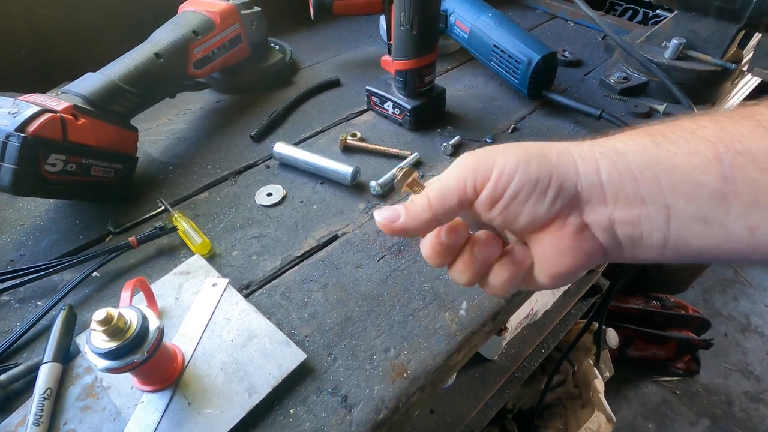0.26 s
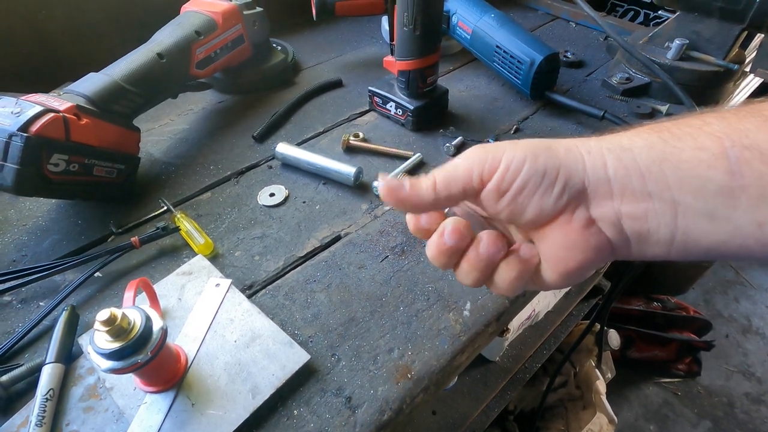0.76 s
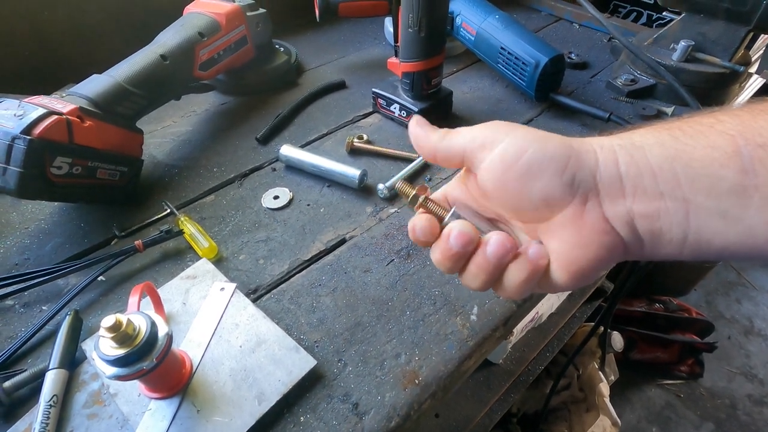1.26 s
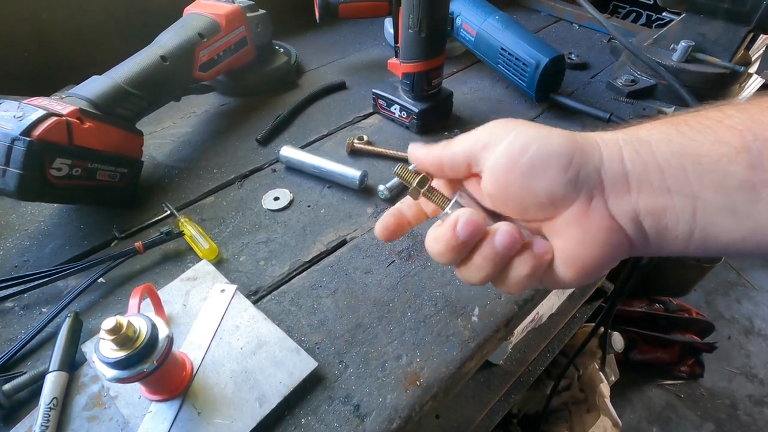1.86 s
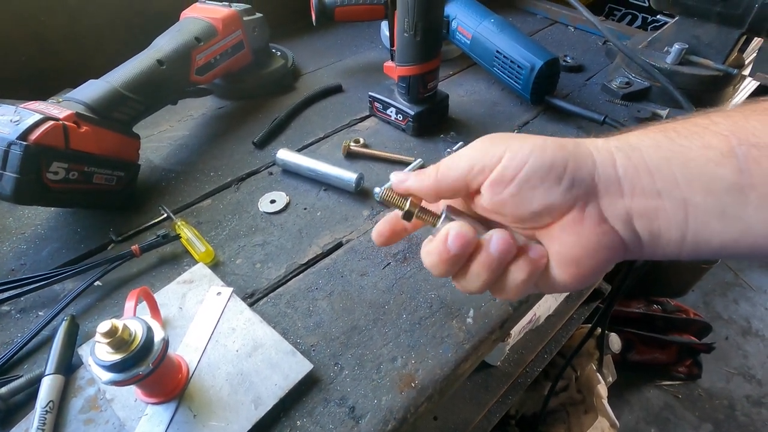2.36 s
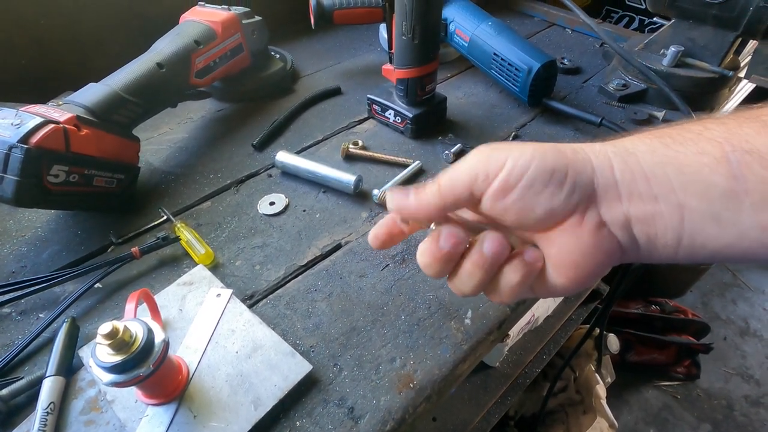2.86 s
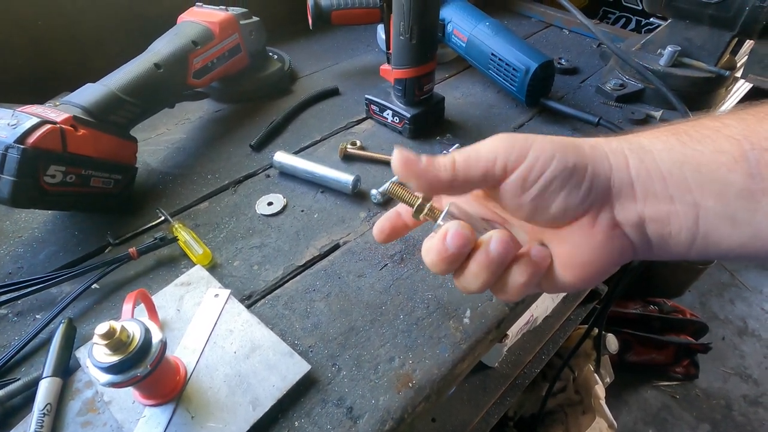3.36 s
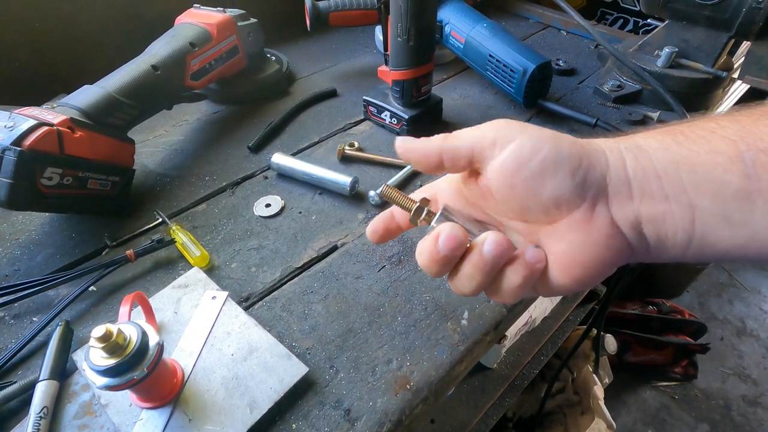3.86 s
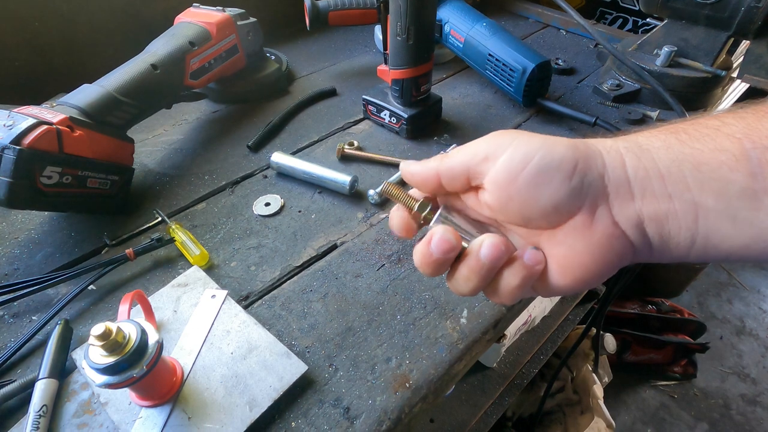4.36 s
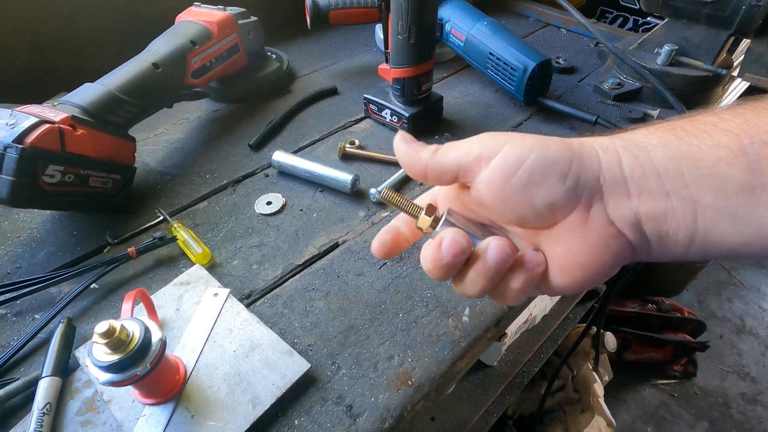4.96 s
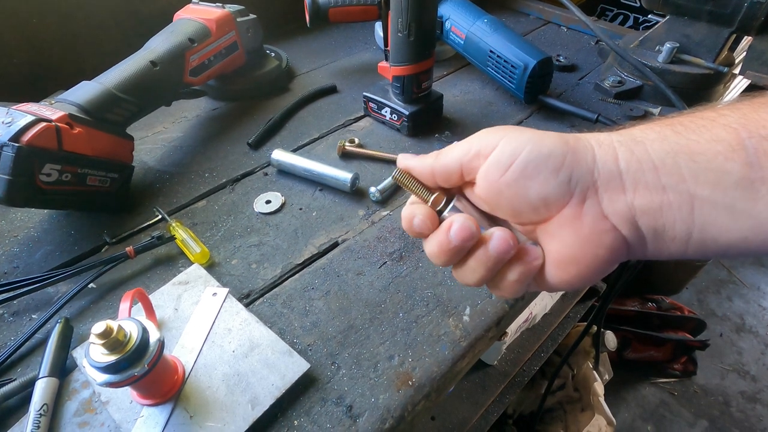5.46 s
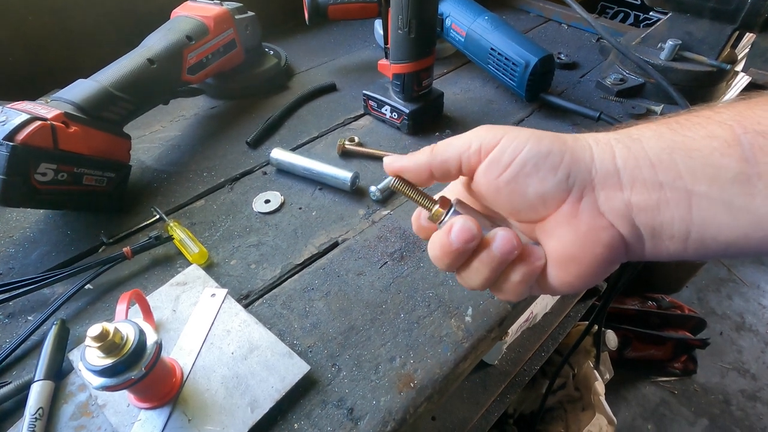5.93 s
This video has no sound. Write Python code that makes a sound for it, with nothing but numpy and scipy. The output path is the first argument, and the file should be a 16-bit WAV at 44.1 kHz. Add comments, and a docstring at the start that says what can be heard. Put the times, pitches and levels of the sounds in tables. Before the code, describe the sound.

Close metallic clicking and scraping, about twice a second, as a nut is spun on a bolt in a workshop, with soft traffic rumble far off.

```python
"""A thumb flicks a steel nut along a hand-held bolt, about twice a second, close to a microphone pair.
Each flick grabs, pushes and slips: the threads scrape, the nut clacks and rings, and the bolt knocks in the fist.
The steel is struck or rubbed by bursts of tiny impacts that ring its resonances, with a short workshop tail.
Far off, shaped noise rumbles as traffic, and a small bird's gliding tones chirp faintly outside."""
import sys
import numpy as np
from scipy import signal
from scipy.fft import rfft, irfft, next_fast_len
from scipy.io import wavfile
from scipy.ndimage import map_coordinates

SR = 44100
rng = np.random.default_rng(int(sys.argv[2]) if len(sys.argv) > 2 else 0)


def digitize_waveform(pressure):
    """Quantize a signal to 16-bit integers and store it at the path in sys.argv[1].

    Rows of a 2-D input are taken as channels; values are limited to [-1, 1].
    """
    field = np.atleast_2d(pressure).T
    bounded = np.clip(field, -1, 1)
    quanta = np.round(bounded * 32767).astype(np.int16)
    wavfile.write(sys.argv[1], SR, quanta)


N = 273137
SIZE = 16384  # samples in one contact sound
HZ = np.fft.rfftfreq(SIZE, 1 / SR)
TIME = np.arange(N) / SR
SHORT_TIME = np.arange(SIZE) / SR

# colour of the bolt damped by the fist: (frequency [Hz], relative level [dB])
BOLT_COLOUR = [(400, -40), (1100, -20), (2100, -32.5), (2550, -4.5), (3500, -5.5), (4350, 2), (5000, -3.5),
               (7000, -10.5), (8200, -16.5), (13000, -20.5), (14800, -47.5)]
# modes that stand out of that colour: (frequency [Hz], width [Hz], relative level [dB])
BOLT_MODES = [(4345, 70, 4), (5291, 70, -6), (6446, 90, -2), (6865, 60, -3)]
# the nut's ring: (frequency [Hz], width [Hz], relative level [dB])
NUT_MODES = [(11830, 46, 0), (12172, 48, -3), (11950, 650, -20)]
# the dull knock in the fist: (frequency [Hz], width [Hz], relative level [dB])
KNOCK_MODES = [(2100, 280, -7.5), (2508, 150, 8)]
# each flick: the thumb grabs the nut, pushes it with a clack, then it slips free with a second clack:
# (time [s], grab strength [dB], push strength [dB], clack strength [dB],
#  wait until the slip [s], slip strength [dB], second clack strength [dB], how freely the nut rings [dB])
THUMB_FLICKS = [(0.323, -33.5, -31.5, -35, .0267, -45, -21.5, -3.5),
                (0.746, -39.5, -31, -30, 0.044, -45, -39, -4.5),
                (1.1495, -41.5, -39.5, -28.5, .053, -43, -36, -6.5),
                (1.6401, -41.5, -41.5, -13, 0.048, -25, -28.5, -0.5),
                (2.0927, -29.5, -33, -25.5, 0.019, -41, -38, 5.5),
                (2.5068, -39, -23.5, -20, .046, -38.5, -26, -0.5),
                (2.954, -34, -25.5, -32, .0442, -48, -24.5, 2),
                (3.3644, -40, -42, -25.5, .0424, -32.5, -26, 0),
                (3.7551, -42, -43, -16.5, .0457, -27, -27.5, 0),
                (4.158, -43.5, -43.5, -31, .038, -63, -52.5, -9),
                (4.6076, -62, -37, -21.5, .012, -51, -48, -14),
                (4.943, -55, -41.5, -20.5, .0225, -63, -38.5, -1),
                (5.2378, -42, -30, -25, 0.042, -40.5, -42, -9),
                (5.637, -37.5, -30, -29, 0.015, -45, -30, -8),
                (6.0254, -45.5, -26.5, -19.5, 0.06, -44, -46, -12.5)]
GRIP_KNOCK = 0.22  # a grip that damps the nut passes more into the fist: dB of knock per dB of ring lost


def amp(db):
    """Decibels to gain."""
    return 10 ** (np.asarray(db) / 20)


def unit(x):
    """Scale to rms 1."""
    return x / np.sqrt(np.mean(x ** 2) + 1e-20)


def along(points, hz):
    """Values of (frequency [Hz], value) points, read on a log frequency axis."""
    f, v = np.transpose(points)
    return np.interp(np.log(hz + 1), np.log(f + 1), v)


def curves(rows):
    """One value per sample for each column after the time."""
    s, *cols = np.transpose(rows)
    return [np.interp(TIME, s, c) for c in cols]


def add(track, s, sound):
    """Mix a sound into a track at s seconds."""
    part = track[max(round(s * SR), 0):][:len(sound)]
    part += sound[:len(part)]


def filtered(x, response):
    """Pass x through a complex response of frequency."""
    m = next_fast_len(N + SR // 2)
    spectrum = rfft(x, m) * response(np.fft.rfftfreq(m, 1 / SR))
    return irfft(spectrum, m)[..., :N]


def resonances(modes, hz):
    """Causal response of damped modes, each (frequency [Hz], width [Hz], level [dB])."""
    return sum(amp(db) * 1j * hz * w / (c * c - hz * hz + 1j * hz * w) for c, w, db in modes)


def causal(gain):
    """Minimum-phase response with the given gain, so that the sound starts at the blow."""
    cepstrum = irfft(np.log(gain))
    cepstrum[1:SIZE // 2] *= 2
    cepstrum[SIZE // 2 + 1:] = 0
    return np.exp(rfft(cepstrum))


def grit(size, rate, spread_db, smooth):
    """Tiny impacts of uneven size, rate a second, over smooth friction noise."""
    hits = (rng.random(size) < rate / SR) * rng.choice([-1, 1], size)
    sizes = amp(spread_db * np.clip(rng.standard_normal(size), -2, 2))
    return unit(hits * sizes) + smooth * rng.standard_normal(size)


def contact(envelope, force, levels_db, vary_db, harden=0.89, firm_db=-31, softest_db=-9):
    """One contact drives bolt, nut and knock; the bolt's colour shifts with the point that is touched."""
    knots = np.linspace(0, SR / 2, num=44)
    shift_db = vary_db * np.interp(HZ, knots, rng.standard_normal(len(knots)))
    colour_db = along(BOLT_COLOUR, HZ) + shift_db
    # a contact that rings the nut harder is shorter, hence brighter
    firmness_db = max(levels_db[1] - firm_db, softest_db)
    colour_db += harden * firmness_db * np.log2(np.maximum(HZ / 6000, 1))
    bolt = causal(amp(colour_db)) * (1 + resonances(BOLT_MODES, HZ))
    nut = resonances(NUT_MODES, HZ)
    knock = resonances(KNOCK_MODES, HZ) * resonances([(2400, 2400, 0)], HZ)
    drive = rfft(envelope * force)
    strength = np.sqrt(np.mean(envelope ** 2))
    bodies = zip(levels_db, (bolt, nut, knock))
    return strength * sum(amp(db) * unit(irfft(drive * body)) for db, body in bodies)


def clicks(rows, t60, settle_db, settle_t60=0.087, snap=0.83, vary_db=3.6):
    """Each click is a sharp blow, a few milliseconds of chatter and a faint settling rattle.

    Rows are (time [s], bolt strength [dB], nut strength [dB], knock strength [dB]); t60s are in seconds.
    """
    track = np.zeros(N)
    chatter = amp(-60 * SHORT_TIME / t60)
    settling = amp(settle_db - 60 * SHORT_TIME / settle_t60)
    for s, *levels_db in rows:
        force = grit(SIZE, rate=3600, spread_db=11.0, smooth=0.99)
        force[0] += snap
        add(track, s, contact(chatter + settling, force, levels_db, vary_db))
    return track


def clacks(ring_limit_db=-20.5, clack_knock_db=-13):
    """The nut strikes the thread as it is pushed and again as it slips free."""
    rows = []
    for s, _, _, first_db, wait, _, second_db, ring_db in THUMB_FLICKS:
        for at, db in (s, first_db), (s + wait, second_db):
            nut_db = min(db, ring_limit_db) + ring_db  # harder blows ring the nut no louder
            knock_db = db + clack_knock_db - GRIP_KNOCK * ring_db
            rows.append((at, db, nut_db, knock_db))
    return clicks(rows, t60=0.016, settle_db=-21.0)


def rubs(catch_rate=145, catch_db=6.0):
    """Each push of the thumb grinds the threads in three swells of dense tiny impacts: grab, push and slip."""
    # the scrapes of grab, push and slip:
    # (time to rise 30 dB [s], time to fall 30 dB [s], nut ring [dB], dull knock [dB])
    scrapes = [(.017, 0.0984, -9, -10), (.018, 0.0371, 1, -22.5), (.026, 0.022, -3.5, -16.5)]
    grab_lead_s, scrape_lag_s = 0.023, .003  # the grab peaks before the clack, the others just after theirs
    track = np.zeros(N)
    for s, grab_db, push_db, _, wait, slip_db, _, ring_db in THUMB_FLICKS:
        grab = s - grab_lead_s, grab_db
        push = s + scrape_lag_s, push_db
        slip = s + wait + scrape_lag_s, slip_db
        for (peak, db), (rise, fall, nut_db, knock_db) in zip((grab, push, slip), scrapes):
            lead = 2 * rise
            since_peak = SHORT_TIME - lead
            envelope = amp(-30 * np.maximum(-since_peak / rise, since_peak / fall))
            # the flanks catch at uneven intervals; each catch starts hard and eases off
            catches = np.cumsum(rng.uniform(.3, 1.6, size=200)) / catch_rate
            easing = np.interp(SHORT_TIME, catches, np.arange(len(catches))) % 1
            grinding = grit(SIZE, rate=2000, spread_db=5.0, smooth=0.34)
            force = unit(amp(-2 * catch_db * easing)) * grinding
            levels_db = db, db + ring_db + nut_db, db + knock_db - GRIP_KNOCK * ring_db
            add(track, peak - lead, contact(envelope, force, levels_db, vary_db=5.5))
    return track


def taps(bolt_db=-6.0, nut_db=-30, damping=0.31):
    """The thumb lands on the bolt with a dull knock, and the flesh damps its ring."""
    # the thumb lands on the loosely held bolt: (time [s], strength before damping [dB])
    thumb_landings = [(0.214, -30.5), (0.305, -22), (0.334, -30), (0.3499, -25), (0.6395, -30), (0.733, -26),
                      (0.774, -28.5), (1.0487, -32), (1.136, -26), (1.334, -27)]
    rows = [(s, db + bolt_db, db + nut_db, db) for s, db in thumb_landings]
    knocks = clicks(rows, t60=0.01, settle_db=-19)
    damped_mode = [(KNOCK_MODES[1][0], 260, 0)]
    return filtered(knocks, lambda hz: 1 - damping * resonances(damped_mode, hz))


def ticks(damped_db=-20, free_db=-4, knock_db=-12, soft_db=-5, bend=(4480, 700, -4)):
    """Under the thumb the nut clicks softly, mostly bending the bolt; just after a flick it is free to ring."""
    # the nut rocks in its play: (time [s], strength before softening [dB])
    rocking = [(0.332, -25.5), (0.3757, -33), (1.175, -34), (1.94, -52), (2.36, -50), (2.4864, -37.5),
               (2.8463, -40), (3.261, -46.5), (3.453, -38.5), (3.468, -37.5), (3.48, -40.5), (4.079, -49),
               (4.4555, -32), (4.8094, -33.5), (4.8883, -28.5), (4.918, -30.5), (5.113, -44.5),
               (5.1615, -40), (5.2331, -20.5), (5.428, -42), (5.467, -37.5), (5.478, -36), (5.52, -30.5),
               (5.5434, -34), (5.5979, -29.5), (5.615, -27), (5.728, -50), (5.807, -40.5), (5.932, -39),
               (5.9725, -33.5)]
    thumb_off_s = .1  # how long the nut stays undamped after a flick
    rows = []
    for s, db in rocking:
        free = any(0 < s - flick[0] < thumb_off_s for flick in THUMB_FLICKS)
        ring_db = free_db if free else damped_db
        # nut and knock escape the softening that the filter below gives
        rows.append((s, db, db + ring_db - soft_db, db + knock_db - soft_db))
    hard = clicks(rows, t60=0.023, settle_db=-16, vary_db=0.0)
    # bend is (frequency [Hz], width [Hz], level [dB])
    return filtered(hard, lambda hz: amp(soft_db) + resonances([bend], hz))


def shank(pitch_hz=4341, t60=.26, attack=.002):
    """Where the grip is loose the bolt's bending mode sings on, fluttering as the nut wobbles and buzzes."""
    # the thumb lets go and the loosely held bolt rings: (time [s], level [dB])
    releases = [(0, -49), (0.329, -35.5), (0.744, -31.5), (0.92, -57), (1.15, -35.5)]
    flutter, buzz_db = .42, -12
    track = np.zeros(N)
    for s, db in releases:
        wobble = map_coordinates(rng.standard_normal(SIZE), [SHORT_TIME * 110])  # 110 random values a second
        buzz = unit(irfft(rfft(rng.standard_normal(SIZE)) * resonances(NUT_MODES, HZ)))
        fade = amp(db - 60 * SHORT_TIME / t60) * (1 - np.exp(-SHORT_TIME / attack))
        tone = (1 + flutter * wobble) * np.sin(2 * np.pi * pitch_hz * SHORT_TIME)
        add(track, s, fade * (tone + amp(buzz_db) * buzz))
    return track


def coasting(nut_db=-15, dull_hz=5500):
    """Between pushes the turning nut ticks faintly: sparse impacts and friction ring bolt and nut."""
    # the nut coasting on the thread: (time [s], level [dB])
    coast = [(0, -76), (.95, -83), (1.5, -95), (3.15, -82.5), (4.65, -71.5), (4.87, -51.5), (5.05, -71),
             (5.7, -57.5), (6.19, -74.5)]
    force = grit(N, rate=21, spread_db=0.0, smooth=0.58)

    def steel(hz):
        bolt = amp(along(BOLT_COLOUR, hz)) * (1 + resonances(BOLT_MODES, hz))
        dulled = bolt / (1 + (hz / dull_hz) ** 4)
        return dulled + amp(nut_db) * resonances(NUT_MODES, hz)

    return amp(curves(coast)[0]) * unit(filtered(force, steel))


def workshop(x):
    """The room answers with a short diffuse tail of fading noise, different at each microphone."""
    # decay of the room: (frequency [Hz], time to fall 60 dB [s])
    decay = [(4000, 0.24), (12000, 0.21)]
    hz, t, noise = signal.stft(rng.standard_normal((2, SR // 2)), SR, nperseg=256)
    fading = noise * amp(-60 * t / along(decay, hz)[:, None])
    tail = signal.istft(fading, SR, nperseg=256)[1]
    tail = np.pad(tail, ((0, 0), (int(0.003 * SR), 0)))  # the tail starts 3 ms late
    return signal.fftconvolve(x[None], tail / np.linalg.norm(tail[0]), axes=1)[:, :N]


def air(gain):
    """Distant sound as stereo noise of rms 1, alike in the bass and wider in the treble."""
    # how alike the two microphones hear it: (frequency [Hz], left-right likeness [0 to 1])
    likeness = [(100, 1), (250, 0.97), (600, 0.82), (12000, 0.38)]

    def mid_side(hz):
        turn = np.arccos(np.clip(along(likeness, hz), -1, 1)) / 2
        return gain(hz) * np.array([np.cos(turn), np.sin(turn)])

    mid, side = filtered(rng.standard_normal((2, N)), mid_side)
    return unit(np.array([mid + side, mid - side]))


def traffic(tyre_db=1.0):
    """Far vehicles: rumble, body and tyre noise, with engines and tyre hiss swelling through."""
    # traffic passing: (time [s], rumble level [dB], body level [dB], tyre level before tyre_db [dB])
    passing = [(0, -35.5, -45, -57), (3, -36, -46.5, -58.5), (3.9, -34.5, -50, -59), (4.8, -32, -46.5, -54),
               (5.5, -36, -49, -55.5), (6.19, -36, -48.5, -55.5)]
    # spectra of the three layers, each (frequency [Hz], relative level [dB])
    rumble_colour = [(10, -10), (30, -9), (46, -1), (66, 2.5), (98, -8.5), (120, -7), (150, -24.5),
                     (1000, -120)]
    body_colour = [(90, -15), (140, 2), (180, -2.5), (215, 1), (270, -7), (380, -10.5), (750, -22),
                   (3000, -55), (9000, -120)]
    tyre_colour = [(300, -11.5), (700, -6), (980, 0.5), (1400, -2.5), (1800, -9), (2600, -19.5),
                   (7000, -26), (8500, -36.5), (14000, -42.5)]
    # engine drones, and one swell of tyre hiss, that rise and fade: (peak time [s], half length [s], frequency
    # [Hz], width [Hz], level [dB])
    swells = [(0.6, 0.62, 452, 140, -55.5), (2, 0.41, 359, 60, -57), (3.02, 0.26, 358, 43, -51),
              (4.524, 0.39, 63.72, 2.8, -30.5), (4.85, 0.38, 1354, 230, -57)]
    rumble, body, tyres = curves(passing)
    layers = (rumble, rumble_colour), (body, body_colour), (tyres + tyre_db, tyre_colour)
    out = sum(amp(db) * air(lambda hz: amp(along(colour, hz))) for db, colour in layers)
    for s, half, pitch, width, db in swells:
        swell = np.exp(-((TIME - s) / half) ** 2)
        drone = swell * air(lambda hz: resonances([(pitch, width, 0)], hz) ** 2)
        out = out + amp(db) * unit(drone) * np.sqrt(np.mean(swell ** 2))
    return out


def bird(length=0.026):
    """A small bird outside: short, thin gliding sine chirps, length in seconds."""
    # its calls: (time [s], start frequency [Hz], end frequency [Hz], level [dB])
    calls = [(4.24, 5400, 5220, -69), (4.304, 5050, 4670, -58), (4.385, 5150, 5340, -60)]
    track, u = np.zeros(N), np.linspace(0, 1, int(length * SR))
    for s, start_hz, end_hz, db in calls:
        phase = 2 * np.pi * np.cumsum(start_hz + (end_hz - start_hz) * u) / SR
        add(track, s, amp(db) * np.sin(np.pi * u) * np.sin(phase))
    return track


def scene(room_db=-17):
    """The steel is close to the microphone pair; everything else is far off."""
    # level between the microphones: (frequency [Hz], left minus right [dB])
    balance = [(1000, -0.5), (2300, -1.5), (4200, -2.5), (8000, -1), (12000, 2.5)]
    # phase between the microphones: (frequency [Hz], lead of the left [rad])
    lead = [(2000, -0.62), (3600, -0.27), (5300, -0.51), (12000, -0.4)]
    steel = clacks() + taps() + ticks() + rubs() + shank() + coasting()
    sides = np.array([[.5], [-.5]])  # each microphone takes half of the difference

    def placed(hz):
        return amp(sides * along(balance, hz)) * np.exp(1j * sides * along(lead, hz))

    near = filtered(steel, placed)
    chirps = bird()
    return near + amp(room_db) * workshop(steel) + chirps + workshop(chirps) + traffic()


def record(dry):
    """The microphones' treble rolls off and ends at a band limit."""
    rolloff = [(12600, -0.5), (13800, -24.0), (15000, -39)]  # (frequency [Hz], gain [dB])
    top_hz = 15000
    return filtered(dry, lambda hz: amp(along(rolloff, hz)) * (hz < top_hz))


dry = scene()
out = record(dry)
digitize_waveform(out)
```